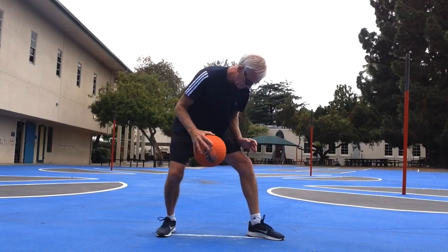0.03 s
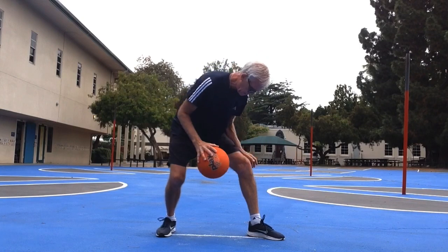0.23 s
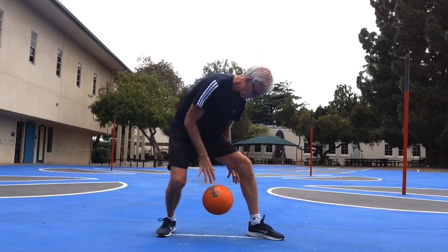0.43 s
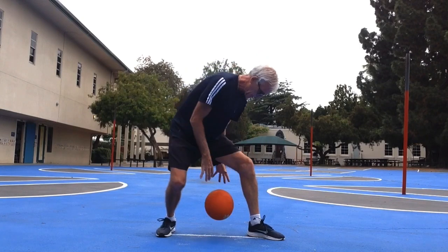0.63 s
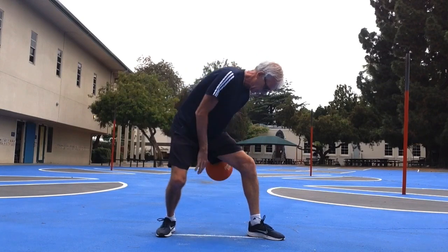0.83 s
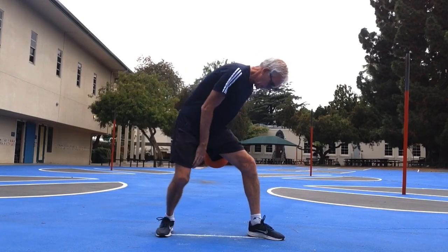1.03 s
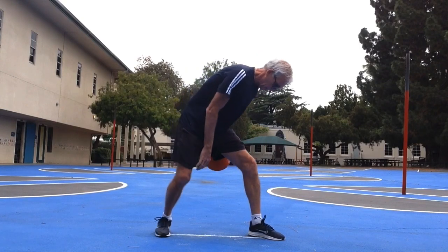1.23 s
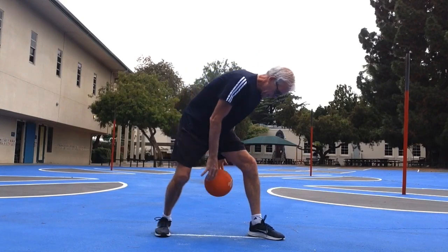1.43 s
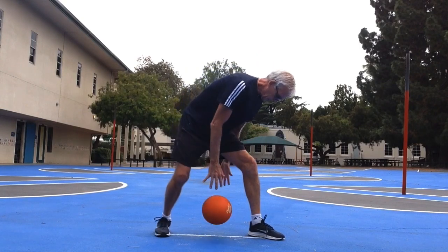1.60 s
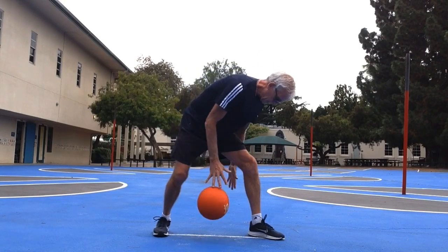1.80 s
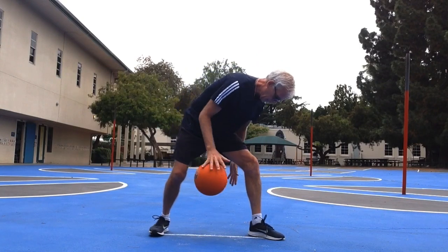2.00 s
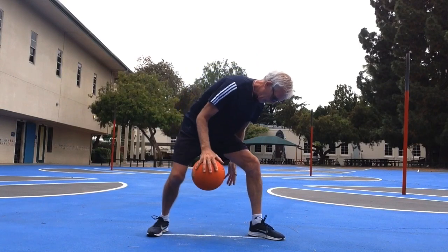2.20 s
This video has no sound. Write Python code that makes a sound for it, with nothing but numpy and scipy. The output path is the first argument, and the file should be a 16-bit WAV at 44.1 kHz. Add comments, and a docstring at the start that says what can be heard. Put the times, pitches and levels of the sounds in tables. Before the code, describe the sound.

A basketball bounces on a hard outdoor court at about 0.6 seconds, with a sharp slap, low thump, brief hollow ring and light wall echo. Hands pat the ball softly around 1.2 to 1.4 seconds. A second bounce lands near 1.7 seconds, followed by quiet scuffs of shoes and clothes until 2 seconds and one faint pat. Low, distant town noise runs underneath.

```python
"""A basketball is dribbled twice on a hard outdoor court beside a building.
Each impact gives a slap and a low thump and excites the cavity modes of the air in the spinning ball.
Walls reflect the sound and the yard scatters it. Hands pat the ball, clothes and shoes scuff by
friction, and distant town noise lies under it all."""
import sys
import numpy as np
from scipy import signal
from scipy.io import wavfile
from scipy.ndimage import uniform_filter1d

SR = 44100
rng = np.random.default_rng(int(sys.argv[2]) if len(sys.argv) > 2 else 0)


def waveform_to_disk(signal):
    """Save audio, clipped to [-1, 1], as 16-bit WAV at the path in sys.argv[1]."""
    frames = np.transpose(np.atleast_2d(signal))
    scaled = np.clip(frames, -1, 1) * 32767
    samples = np.round(scaled).astype(np.int16)
    wavfile.write(sys.argv[1], SR, samples)


N = 99357
t = np.arange(N) / SR


def amp(db):
    """Amplitude ratio of a level in decibels."""
    return 10 ** (np.asarray(db) / 20)

def unit(x):
    """Normalisation to rms 1."""
    return x / np.sqrt(np.mean(x ** 2) + 1e-20)

def interpolate(points, hz):
    """Interpolation on a log-frequency axis."""
    f, value = np.transpose(points)
    return np.interp(np.log(hz + 1), np.log(f + 1), value)

def decay(age, t60):
    """Exponential damping, 60 dB down at t60."""
    return np.exp(-np.log(1000) * age / t60)

def add(mix, start_s, sound):
    """Superposition of a delayed sound."""
    part = mix[max(round(start_s * SR), 0):][:len(sound)]
    part += sound[:len(part)]

def colour(x, spectrum):
    """Minimum-phase filtering to a given spectrum."""
    hz = abs(np.fft.fftfreq(4096, 1 / SR))
    log_gain = np.log(amp(interpolate(spectrum, hz)))
    taps = np.fft.ifft(np.exp(np.conj(signal.hilbert(log_gain)))).real
    return signal.fftconvolve(x, taps[:len(taps) // 2])[:len(x)]

def lowpass(x, hz):
    """Second-order treble roll-off."""
    return signal.sosfilt(signal.butter(2, hz, fs=SR, output="sos"), x)

def drift(samples):
    """Random fluctuation, smoothed by moving averages."""
    return unit(uniform_filter1d(uniform_filter1d(rng.standard_normal(N), samples), samples))

def burst(t60):
    """Exponentially damped noise of energy 1."""
    noise = rng.standard_normal(N) * decay(t, t60)
    return noise / np.linalg.norm(noise)


# Each row: frequency in Hz, relative spectral density in dB.
TOWN_SPECTRUM = [(15, -26), (25, -55), (59, -7.5), (133, -4), (231, -8.5), (280, -14.5), (411, -12),
                 (574, -15.5), (679, -18), (1120, -24.5), (1680, -31), (2650, -33.5), (3290, -30),
                 (4080, -34), (7600, -39.5), (9880, -76), (16700, -120)]

def town(level_db=-47.5, waver_db=1, whine_hz=3358, waver_hz=3, whine_db=-71):
    """Broadband noise of a distant town, with a faint frequency-modulated whine."""
    wash = unit(colour(rng.standard_normal(N), TOWN_SPECTRUM))
    wash *= amp(level_db + waver_db * drift(2000))
    whine = np.sin(2 * np.pi * np.cumsum(whine_hz + waver_hz * drift(1500)) / SR)
    return wash + amp(whine_db) * unit(whine)


# Each row: frequency in Hz, relative level in dB.
FRICTION_SPECTRUM = [(200, -3.5), (700, 1.5), (1000, 1.5), (1600, 1), (2100, -3), (2700, -10), (4300, -7.5),
                     (5500, -18.5), (7500, -18.5)]

def friction(grain_db=1.5):
    """Friction noise: random amplitude modulation clumps it into grains."""
    grains = rng.standard_normal(N) * amp(grain_db * drift(40))
    return unit(colour(grains, FRICTION_SPECTRUM))


# Short catches. Each row: start in seconds, level in dB, length in seconds.
CATCHES = [(1.005, -52.5, 0.0085), (1.112, -48, .012), (1.149, -52, .01), (1.157, -47, .012),
           (1.464, -51, .01), (1.76, -45, 0.017), (1.8188, -34.5, 0.0053), (1.842, -36, .008),
           (1.863, -37, 0.01), (1.886, -40.5, 0.006), (1.901, -41, 0.014), (1.906, -58, 0.0036),
           (1.925, -43, 0.0098), (1.945, -33.5, 0.0045), (1.95, -42, 0.014), (1.968, -40, 0.018),
           (1.993, -43.5, .007), (2.0214, -40.5, 0.0089), (2.0411, -40, 0.0088)]
# Cloth swishes. Each row: centre and half length in seconds, gain in dB, treble cutoff in Hz.
CLOTH_SWISHES = [(1.032, 0.38, -42.5, 500), (1.092, 0.32, -59, 6040), (1.368, 0.45, -61, 1760),
                 (1.917, 0.15, -46, 6800)]

def scuffs():
    """Sliding friction of clothes and shoes: incoherent catches add in power over longer swishes."""
    power = np.zeros(N)
    for start, db, length in CATCHES:
        age = np.maximum(t - start, 0) / (length / np.pi)
        power += (amp(db) * age * np.exp(1 - age)) ** 2
    out = np.sqrt(power) * friction()
    for centre, half, db, cutoff_hz in CLOTH_SWISHES:
        swell = np.exp(-((t - centre) / half) ** 2)
        out += amp(db) * swell * lowpass(friction(), cutoff_hz)
    return out


# Each row: start in seconds, level in dB, pitch in Hz.
HAND_PATS = [(1.23, -35, 108), (1.271, -30.5, 82.6), (1.288, -29.5, 102), (1.438, -38.5, 81.5),
             (2.112, -42.5, 128)]

def pats(rise_s=.0029, t60=.12):
    """Soft impacts of the hand on the ball: damped low vibrations mixed with dull noise."""
    age, out = t[:SR // 2], np.zeros(N)
    for start, db, hz in HAND_PATS:
        noise = unit(lowpass(rng.standard_normal(len(age)), 2 * hz))
        thud = np.sin(2 * np.pi * hz * age) + .5 * noise
        envelope = np.minimum(age / rise_s, 1) * decay(age, t60)
        add(out, start, amp(db) * envelope * thud)
    return out


# Each row: delay in seconds, gain in dB, relative smear in dB, treble cutoff in Hz.
WALLS = [(.0525, -12, -12, 190), (.0758, -18, -12, 160), (.25, -29, -9, 180), (.306, -28, -6, 180)]

def wall_echoes(hit, echo_db, smear_t60=.02):
    """Reflection: each wall returns a delayed, dull, slightly smeared copy."""
    out = np.zeros(N)
    for delay, db, smear_db, cutoff_hz in WALLS:
        response = (t == 0) + amp(smear_db) * burst(smear_t60)
        echo = lowpass(signal.fftconvolve(hit, response)[:N], cutoff_hz)
        add(out, delay, amp(db + echo_db) * echo)
    return out


# Each row: frequency in Hz, relative level in dB, reverberation time in seconds.
YARD_BANDS = [(80, 3.5, 1.3), (200, -18, 0.77), (500, 0, 0.59), (910, -3.5, 1.8), (2000, -6.5, 1.9),
              (4000, -2.5, .6), (8000, -2, 0.22)]

def reverberation(hit, tail_db=-22, near_db=-11.5, near_t60=.18):
    """Diffuse scattering in the yard: a short near part and a faint tail that decays band by band."""
    hz, age, spectrum = signal.stft(rng.standard_normal(N), SR, nperseg=512)
    bands = np.array(YARD_BANDS)
    gain = amp(interpolate(bands[:, :2], hz))[:, None]
    t60 = interpolate(bands[:, ::2], hz)[:, None]
    tail = signal.istft(spectrum * gain * decay(age, t60), SR, nperseg=512)[1][:N]
    response = amp(tail_db) * tail / np.linalg.norm(tail) + amp(near_db) * burst(near_t60)
    return signal.fftconvolve(hit, response)[:N]


def thump(hz, glide=.58, glide_s=.0054, t60=.078):
    """A heavily damped oscillation whose pitch sags to hz."""
    cycles = np.cumsum(hz * (1 + glide * np.exp(-t / glide_s))) / SR
    return decay(t, t60) * np.sin(2 * np.pi * cycles)

def wobble(hz=137, rise_s=.012, t60=.26):
    """A low resonance of the casing builds up and dies away."""
    return (1 - np.exp(-t / rise_s)) * decay(t, t60) * np.sin(2 * np.pi * hz * t)

def snap(hz, half_width_hz=250, t60=.024, gain_db=-15):
    """A narrow-band transient of the skin: damped noise heterodyned up to hz."""
    band = lowpass(burst(t60), half_width_hz) * np.sin(2 * np.pi * hz * t)
    return amp(gain_db) * band / np.linalg.norm(band)


# Each row: frequency in Hz, relative level in dB.
CRACK_SPECTRUM = [(100, -36), (320, 9.5), (560, -7), (900, 0), (2000, 1.5), (2600, -14), (3800, -10),
                  (5400, -25.5), (8000, -29.5)]

def crack(t60=.017, gain_db=9):
    """Rapid deformation: the skin radiates a noise burst as it flattens."""
    return amp(gain_db) * colour(burst(t60), CRACK_SPECTRUM)


# Each row: frequency in Hz, relative level in dB.
SLAP_SPECTRUM = [(40, -35.5), (90, -17), (220, 6), (320, -13.5), (430, 3.5), (850, 4.5), (1300, -1.5),
                 (2000, -4), (2700, -35), (4000, -37.5), (7500, -63.5)]
# Each row: frequency in Hz, relative level in dB, 60 dB decay time in seconds.
CASING_MODES = [(437, -13.5, 0.036), (772, -29, 0.051), (1170, -39.5, 0.02), (1587, -32.5, 0.12),
                (1800, -22.5, 0.025), (2090, -31, 0.027), (2510, -33, 0.046)]

def slap(pulse_db=19):
    """Impulse excitation: rubber strikes the court and the casing's modes give a short knock."""
    pulse = amp(pulse_db) * colour(1. * (t == 0), SLAP_SPECTRUM)
    knock = sum(amp(db) * decay(t, t60) * np.sin(2 * np.pi * hz * t) for hz, db, t60 in CASING_MODES)
    return -(pulse + knock)


# Each row: settled frequency in Hz, relative level in dB, 60 dB decay time in seconds,
# seconds after impact at which the mode's lobe faces the microphone.
CAVITY_MODES = [(533.3, -33, 0.51, 0.085), (833, -38.5, 1.8, 0.036), (1120, -48, 1.9, .005),
                (1449, -50, 0.48, 0.048), (1690, -64.5, 0.17, .05), (2000, -55.5, 0.34, 0.072),
                (2327, -53, 0.26, 0.064)]

def ping(stretch=.0756, round_s=.0394, rounding_s=.004, early_db=5, early_t60=.049):
    """Cavity resonance: the enclosed air rings sharp and loud until the ball is round again."""
    spin_hz, spin_depth = 5.2, .55
    squash = .5 * (1 - np.tanh((t - round_s) / rounding_s))
    clock = np.cumsum(1 + stretch * squash) / SR
    ring = np.zeros(N)
    for hz, db, t60, facing in CAVITY_MODES:
        # spin turns the lobes, so each mode swells and sinks
        lobe = 1 + spin_depth * np.cos(2 * np.pi * spin_hz * (t - facing))
        ring -= amp(db) * lobe * decay(t, t60) * np.sin(2 * np.pi * hz * clock)
    return (1 + amp(early_db) * decay(t, early_t60)) * ring


# Each row: start in seconds, slap and crack gains in dB, snap pitch in Hz and gain in dB,
# thump pitch in Hz and gain in dB, then lift-off, ping, wobble and wall echo gains in dB.
DRIBBLE = [(0.5655, 0, 3, 6400, -6, 112.8, -9, -36.5, -1, -15.5, 4),
           (1.6591, -3, 3, 3786, 4.5, 137.7, -11.5, -16, -6.5, -25.5, 0)]

def basketball(crack_delay_s=.0008, contact_s=.012, lift_hz=106):
    """Elastic collision: the ball thumps on landing and lift-off, rings, and the yard answers."""
    out = np.zeros(N)
    for (start, slap_db, crack_db, snap_hz, snap_db, thump_hz, thump_db,
         lift_db, ping_db, wobble_db, echo_db) in DRIBBLE:
        hit = amp(slap_db) * slap() + amp(snap_db) * snap(snap_hz)
        hit += amp(thump_db) * thump(thump_hz)
        add(hit, crack_delay_s, amp(crack_db) * crack())
        add(hit, contact_s, amp(lift_db) * thump(lift_hz))
        hit += amp(wobble_db) * wobble() + amp(ping_db) * ping()
        add(out, start, hit + wall_echoes(hit, echo_db) + reverberation(hit))
    return out


def scene():
    """Superposition of all sources at one microphone."""
    return (basketball() + pats() + scuffs() + town())[None]

def record(dry, low_hz=48, high_hz=7650):
    """Band limiting: the microphone's low cut, then a steep treble cutoff."""
    thin = signal.sosfilt(signal.butter(2, low_hz, "high", fs=SR, output="sos"), dry)
    taps = signal.firwin(601, high_hz, window=("kaiser", 8), fs=SR)
    return signal.oaconvolve(thin, taps[None], "same")


dry = scene()
out = record(dry)
waveform_to_disk(out)
```